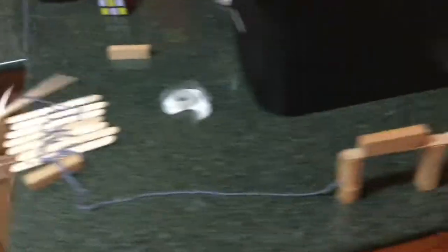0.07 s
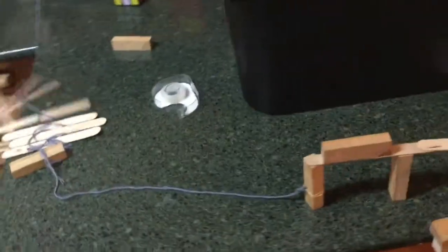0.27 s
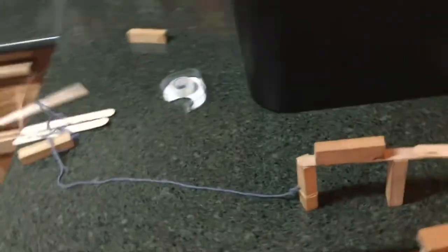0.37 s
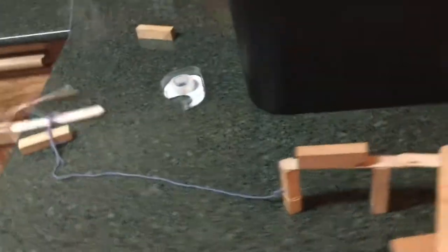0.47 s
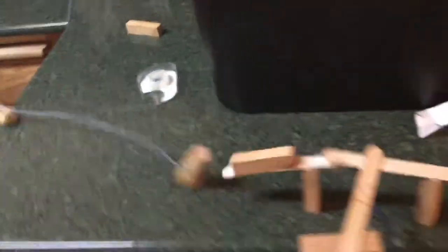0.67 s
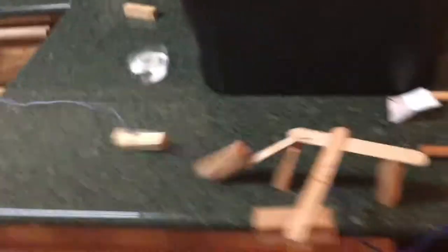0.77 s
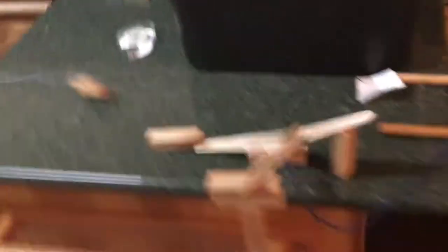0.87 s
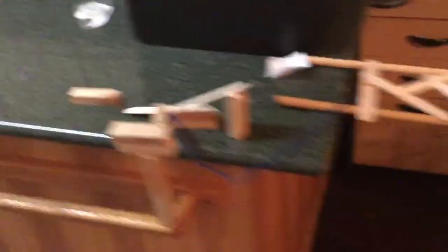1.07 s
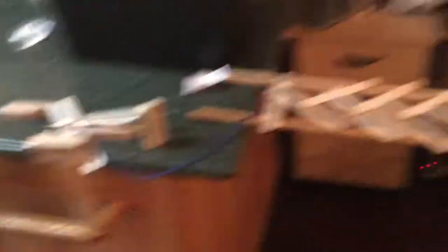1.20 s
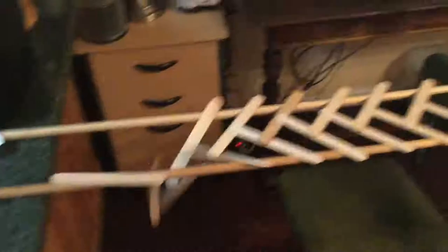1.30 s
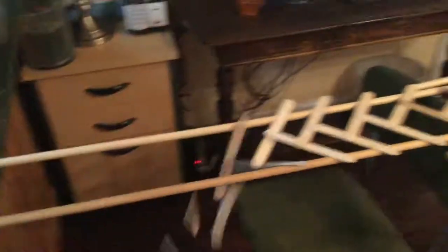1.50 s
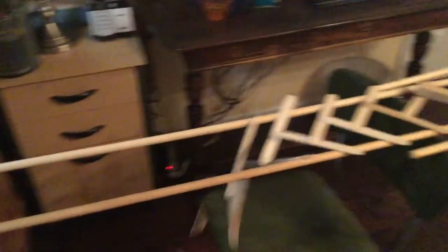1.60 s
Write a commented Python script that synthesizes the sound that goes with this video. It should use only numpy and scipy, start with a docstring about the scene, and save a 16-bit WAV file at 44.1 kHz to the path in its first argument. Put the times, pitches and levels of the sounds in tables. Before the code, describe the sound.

In a small, echoing room, wooden sticks snap loose and clatter quickly over a countertop, bouncing near and far. Blocks fall with sharp clacks close to the microphone before a few final sticks drop.

```python
"""A woven chain of craft sticks springs apart on a stone countertop, over a low room rumble.
First a few sticks snap loose: the counter thuds, flying sticks ring and flat landings knock.
From 0.2 s sticks rain down near and far and bounce; the small, echoing room blurs them into a clatter.
Around 0.9 s wooden blocks topple and land close by with sharp clacks.
Near 1.35 s the level dips briefly, then the last sticks land and ring out."""
import sys
import numpy as np
from scipy import signal
from scipy.fft import rfft, irfft, next_fast_len
from scipy.io import wavfile

SR = 44100
rng = np.random.default_rng(int(sys.argv[2]) if len(sys.argv) > 2 else 0)


def generate_wav(signal):
    """Clip the signal to [-1, 1] and save it as 16-bit WAV at the path in sys.argv[1]."""
    frames = np.transpose(np.atleast_2d(signal))
    scaled = np.clip(frames, -1, 1) * 32767
    pcm = np.round(scaled).astype(np.int16)
    wavfile.write(sys.argv[1], SR, pcm)


N = 72765


def amp(db):
    """Turn decibels into a number to multiply by."""
    return 10 ** (np.asarray(db) / 20)


def along(points, hz):
    """Read a curve of (Hz, value) points at any frequency, on a log scale."""
    point_hz, values = np.transpose(points)
    return np.interp(np.log(hz + 1), np.log(point_hz + 1), values)


def fade(t, t60):
    """Die away by 60 dB in t60 seconds: the fade time."""
    return np.exp(-np.log(1000) * t / t60)


def unit_energy(x):
    """Scale x to an energy of one."""
    return x / np.linalg.norm(x)


def add(track, start, x):
    """Mix x into the track at a start time in seconds."""
    i = max(0, round(start * SR))
    track[i:i + len(x)] += x[:N - i]


def coloured(x, *colours):
    """Filter x by tone colours: curves of (Hz, dB) points."""
    n = len(x)
    hz = np.fft.rfftfreq(n, 1 / SR)
    gain = amp(sum(along(c, hz) for c in colours))
    cepstrum = irfft(np.log(gain), n)
    cepstrum[1:n // 2] *= 2  # folded so that the filter rings after a hit, not before
    cepstrum[n // 2 + 1:] = 0
    return irfft(rfft(x) * np.exp(rfft(cepstrum)), n)


def noise(colour, size):
    """Noise with the given tone colour and an average (rms) level of one."""
    gain = amp(along(colour, np.fft.rfftfreq(size, 1 / SR)))
    x = irfft(rfft(rng.standard_normal(size)) * gain, size)
    return x / x.std()


def wood_hit(notes, pitch, crack_s, ring_db, size=4096):
    """Struck wood gives a brief crack of noise and rings on its own fast-fading notes."""
    t = np.arange(size) / SR
    hz, db, t60 = np.transpose(notes)[:, :, None]
    gains = amp(db + rng.normal(0, 1, db.shape))
    ring = (gains * fade(t, t60) * np.sin(2 * np.pi * hz * pitch * t)).sum(0)
    crack = rng.standard_normal(size) * fade(t, crack_s)
    return unit_energy(crack) + amp(ring_db) * unit_energy(ring)


# The room's echo. Each row: frequency in Hz, fade time in seconds.
ROOM_FADES = [(150, 0.55), (1000, 0.45), (2500, 0.36), (5000, 0.42), (8000, 0.35), (12000, 0.35),
              (16000, 0.25)]
WALL_DELAY_S, ROOM_RISE_S, EARLY_DB, EARLY_S = 0.00033, 0.0014, 4.5, 0.017

def in_room(x, direct_db, size=256):
    """A hit plus its own echo. More direct sound over the echo makes it seem closer."""
    hz, frame_s, spectrum = signal.stft(rng.standard_normal(SR // 2), SR, nperseg=size)
    spectrum = spectrum * fade(frame_s, along(ROOM_FADES, hz)[:, None])
    tail = signal.istft(spectrum, SR, nperseg=size)[1]
    t = np.arange(len(tail)) / SR
    rise = 1 - np.exp(-np.maximum(t - WALL_DELAY_S, 0) / ROOM_RISE_S)
    tail *= rise * amp(EARLY_DB * np.exp(-t / EARLY_S))
    heard = unit_energy(signal.fftconvolve(x, tail))
    heard[:len(x)] += amp(direct_db) * unit_energy(x)
    return heard * np.sqrt(SR * 0.028)  # the echo starts near a level of one


# The rumble's tone colour. Each row: frequency in Hz, boost or cut in dB.
RUMBLE_COLOUR = [(20, -26.5), (40, -25), (70, -1.5), (120, -7.5), (200, -12.5), (330, -14.5), (520, -18.5),
                 (750, -33), (1200, -30), (2500, -38), (6000, -44), (15000, -41.5)]

def room_rumble(level_db=-57):
    """The room hums with quiet, low noise from start to end."""
    return amp(level_db) * noise(RUMBLE_COLOUR, next_fast_len(N))[:N]


# Stick hits. Each row: start in seconds, level in dB, hollow body in dB, bright edge in dB,
# direct sound over echo in dB.
STICK_HITS = [(0, -49, 8, 4, -12), (.0187, -44.5, 5, 7.5, -2.5), (.032, -48.5, -5, 18, 9.5),
              (0.0384, -37.5, 4.5, -7, -1), (.044, -38.5, 15.5, 6.5, -0.5), (0.1337, -47, 0, 3, -5),
              (.14, -37.5, 10, -20, -6), (.188, -47, 8, -6, -7), (0.221, -25.5, -3.5, 4.5, -11),
              (0.2242, -27.5, -10, 2, -15), (0.2732, -27, -2, 5, -2), (.2818, -22.5, 3, 1.5, -1),
              (0.2861, -21.5, 1.5, 10, -6.5), (0.2957, -21.5, -20, 5, -2), (0.342, -26, -7, 7, -4),
              (0.385, -43, 17, 3, -15), (.394, -34, 1.5, -8, -21), (0.41, -38, -2.5, 3.5, -12),
              (.434, -27.5, 0.5, 5.5, -9), (.447, -33, -28, 10.5, -11.5), (0.499, -30, 2, -3.5, -12),
              (0.51, -32.5, -1, 3, -4), (.526, -29.5, -2, 6.5, -17), (0.538, -28.5, -5.5, 8.5, -14.5),
              (0.5559, -27, -5.5, 4.5, -4.5), (0.5658, -25.5, -7, -4, -3.5), (.576, -36.5, 5.5, -12, -17.5),
              (0.6146, -30, 9, 5.5, -2), (.624, -26, -4.5, -29, -6), (.635, -27.5, 11.5, 12.5, -11),
              (.661, -32, -7, 4.5, -17.5), (.685, -25.5, -4.5, 18, -18.5), (0.72, -28.5, -10, 4.5, -15),
              (.729, -28, 6, 12, -19.5), (0.742, -28, 0, 2.5, -23), (0.768, -26.5, -7, 11.5, -15.5),
              (0.779, -35, -0.5, 12, -13), (0.807, -32, 3, 0, -22), (0.8313, -25, 1.5, 10, -12.5),
              (0.8501, -25, 1, 5.5, -5.5), (0.851, -24.5, -1.5, 0.5, 0.5), (.871, -38, -4.5, 17.5, -8.5),
              (0.8823, -33.5, 8, -5, 2), (0.961, -30.5, -3, -5.5, -2.5), (0.9673, -23, -9, 0, -3.5),
              (.98, -28, -7.5, -1, -20.5), (1.049, -33.5, 4.5, 3.5, -2), (1.0551, -34, 3.5, -10, -3),
              (1.064, -29, 12.5, -1, -5), (1.078, -28, -8, 11.5, -12.5), (1.0908, -26, -4.5, 7, -8),
              (1.106, -29, -17, -11.5, -15.5), (1.115, -25.5, 7, 9.5, -5), (1.144, -40, 5, 0.5, 5),
              (1.201, -57, 1, -0.5, -10.5), (1.239, -35, -14, 8, -7.5), (1.2858, -33.5, -13, 7, -3),
              (1.292, -31, -3, 6.5, -5.5), (1.3, -31, 6.5, 7, -9), (1.305, -23, -4, 8, -4),
              (1.394, -42, -5.5, -0.5, 1)]
# A stick's tone colour. Each row: frequency in Hz, boost or cut in dB.
STICK_COLOUR = [(60, -24.5), (170, -12), (350, -10.5), (520, -12), (800, -11), (1200, -7.5), (2300, -4),
                (3600, 0), (6000, -1), (8500, -1), (12500, -0.5), (16000, -3.5)]
# A stick's own notes. Each row: frequency in Hz, level in dB, fade time in seconds.
STICK_NOTES = [(1254, -6, 0.014), (2086, -7.5, .012), (3680, -8, 0.015), (5570, -5, .007),
               (6750, -2.5, 0.0046), (8635, 1, 0.012), (10660, -12.5, 0.0019), (12230, -6, 0.0036),
               (14500, -2, .004)]
STICK_PITCH_SPREAD = 0.1

def sticks():
    """Flat landings sound hollow, edge hits bright; every stick has a slightly different pitch."""
    out = np.zeros(N)
    for start, db, body_db, edge_db, direct_db in STICK_HITS:
        pitch = np.exp(STICK_PITCH_SPREAD * rng.normal())
        hit = wood_hit(STICK_NOTES, pitch, crack_s=0.011, ring_db=-4.5)
        landing_colour = [(150, 0.0011), (1200, body_db), (1900, body_db),
                          (4200, 0.0046), (6500, 0.0058), (12000, edge_db)]
        hit = coloured(hit, STICK_COLOUR, landing_colour)
        add(out, start, amp(db) * in_room(hit, direct_db))
    return out


# Thuds of the counter. Each row: start in seconds, level in dB.
THUDS = [(0.038, -53), (0.142, -64), (.224, -66.5), (0.281, -69), (.405, -44), (0.512, -63), (.62, -54.5),
         (.73, -51), (.85, -41.5), (.992, -40), (1.065, -46.5), (1.116, -46)]
# The counter's tone colour. Each row: frequency in Hz, boost or cut in dB.
COUNTER_COLOUR = [(40, -29.5), (100, -20), (165, 11), (210, -0.5), (270, -10.5), (360, 1), (470, -22.5),
                  (560, -6.5), (1500, -49.5)]

def counter_thuds(fade_s=0.56, rise_s=0.0068):
    """Heavier landings make the counter and its cabinet thud."""
    out, t = np.zeros(N), np.arange(SR // 2) / SR
    shape = fade(t, fade_s) * (1 - np.exp(-t / rise_s))
    for start, db in THUDS:
        add(out, start, amp(db) * noise(COUNTER_COLOUR, len(t)) * shape)
    return out


# Thin notes of sticks in the air. Each row: start in seconds, pitch in Hz, level in dB.
FLYING_NOTES = [(.039, 3380, -41.5), (0.043, 13450, -42), (.14, 3570, -44.5), (.14, 7060, -63),
                (.14, 9050, -51), (.222, 3570, -39), (0.225, 8730, -31), (.51, 7400, -47),
                (1.238, 8660, -37.5), (1.361, 8060, -36.5), (1.36, 5920, -41.5), (1.392, 4170, -46)]

def flying_sticks(fade_s=0.26, blur=0.012):
    """A stick thrown clear keeps ringing on a slightly blurred note."""
    out, t = np.zeros(N), np.arange(SR // 2) / SR
    for start, hz, db in FLYING_NOTES:
        wander = np.cumsum(rng.standard_normal(len(t))) * np.sqrt(2 * np.pi * blur * hz / SR)
        note = np.sqrt(2) * np.sin(2 * np.pi * hz * t + wander)
        add(out, start, amp(db) * fade(t, fade_s) * note)
    return out


# Hollow knocks. Each row: start in seconds, level in dB, pitch in Hz, direct sound over echo in dB.
KNOCKS = [(.039, -49, 480, 2), (.14, -49, 400, -5.5), (.141, -58, 790, 1), (0.223, -50, 420, -4.5),
          (.387, -49.5, 850, 1), (.436, -50, 2290, 1.5), (0.501, -49, 1580, -3), (.62, -47, 766, -10),
          (0.73, -47.5, 1310, -6), (.851, -42, 1440, 5), (.8825, -47.5, 1470, -2), (0.8815, -47, 3300, 2),
          (0.961, -37.5, 4100, 4), (0.9882, -34.5, 2924, 3.5), (1.0643, -46, 1170, 2.5),
          (1.068, -51, 1040, -2), (1.115, -48.5, 1170, 3.5), (1.145, -51, 1130, 1.5)]

def flat_knocks(fade_s=0.014, rise_s=0.00044):
    """A piece that lands flat bends and gives one short, hollow note."""
    out, t = np.zeros(N), np.arange(2048) / SR
    shape = fade(t, fade_s) * (1 - np.exp(-t / rise_s))
    for start, db, hz, direct_db in KNOCKS:
        knock = np.sin(2 * np.pi * hz * t) * shape
        add(out, start, amp(db) * in_room(knock, direct_db))
    return out


# When the light bounces happen: start and end in seconds.
RATTLE_SPAN = [.29, 1.2]

def rattle(count=30, level_db=-41, spread_db=5.5):
    """Fallen sticks bounce and tick against each other while the chain runs."""
    out = np.zeros(N)
    for k in range(count):
        start = np.interp(k + rng.random(), [0, count], RATTLE_SPAN)
        pitch = np.exp(STICK_PITCH_SPREAD * rng.normal())
        tick = coloured(wood_hit(STICK_NOTES, pitch, crack_s=0.012, ring_db=-7.5), STICK_COLOUR)
        db = level_db + spread_db * rng.normal()
        add(out, start, amp(db) * in_room(tick, direct_db=-6))
    return out


# Block hits. Each row: start in seconds, level in dB, pitch multiplier, direct sound over echo in dB.
BLOCK_HITS = [(0.9011, -24, 1, 1), (0.905, -32, 1.2, -1), (0.9878, -28, 1.1, 4.5), (0.9898, -25, 1.03, 6),
              (0.993, -39, 1.3, 11), (1.002, -47.5, .8, -1), (1.013, -28.5, 1.1, -10), (1.025, -34, 1.5, 5)]
# A block's own notes. Each row: frequency in Hz, level in dB, fade time in seconds.
BLOCK_NOTES = [(3025, -6, 0.0082), (4220, -6.5, 0.011), (5520, 3.5, 0.0086), (6900, -4, .01),
               (7570, 3, .011), (8780, -6, 0.01), (13600, -8.5, .007)]
# A block's tone colour. Each row: frequency in Hz, boost or cut in dB.
BLOCK_COLOUR = [(60, -29.5), (350, -19), (800, -16.5), (1500, -6), (3000, -5.5), (6000, -1.5), (9200, 5),
                (10200, -11), (14000, -3.5), (16000, -10.5)]

def blocks(pitch_spread=0.012):
    """Hardwood blocks clack on the stone close by."""
    out = np.zeros(N)
    for start, db, pitch, direct_db in BLOCK_HITS:
        pitch *= np.exp(pitch_spread * rng.normal())
        clack = coloured(wood_hit(BLOCK_NOTES, pitch, crack_s=0.0066, ring_db=-1), BLOCK_COLOUR)
        add(out, start, amp(db) * in_room(clack, direct_db))
    return out


def scene():
    """All the wood and the counter over the room's rumble, in one channel."""
    wood = sticks() + rattle() + flat_knocks() + blocks() + flying_sticks()
    return (wood + counter_thuds() + room_rumble())[None]


# A brief dip in level. Each row: time in seconds, level change in dB.
LEVEL_DIP = [(1.328, 0), (1.345, -8), (1.35, -11), (1.353, -28), (1.3585, -28), (1.3605, -2), (1.39, 0)]

def record(dry, top_hz=15800):
    """The level dips once; peaks stop at full scale and the highest treble is cut."""
    dip_db = np.interp(np.arange(N) / SR, *np.transpose(LEVEL_DIP))
    clipped = np.clip(dry * amp(dip_db), -1, 1)
    size = next_fast_len(N + SR // 2)
    below_top = np.fft.rfftfreq(size, 1 / SR) < top_hz
    return irfft(rfft(clipped, size) * below_top, size)[:, :N]


dry = scene()
out = record(dry)
generate_wav(out)
```